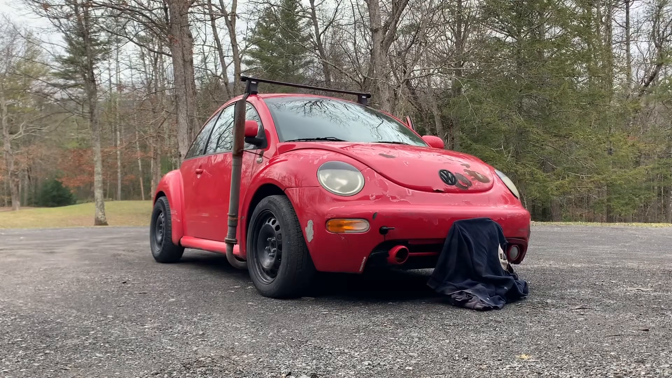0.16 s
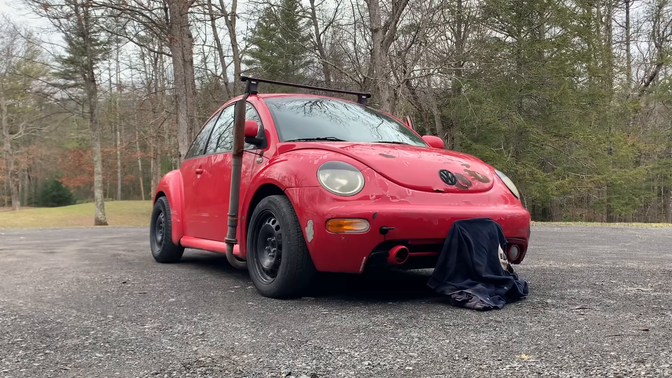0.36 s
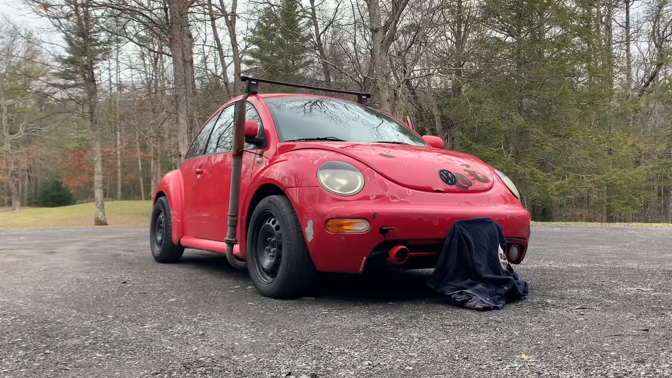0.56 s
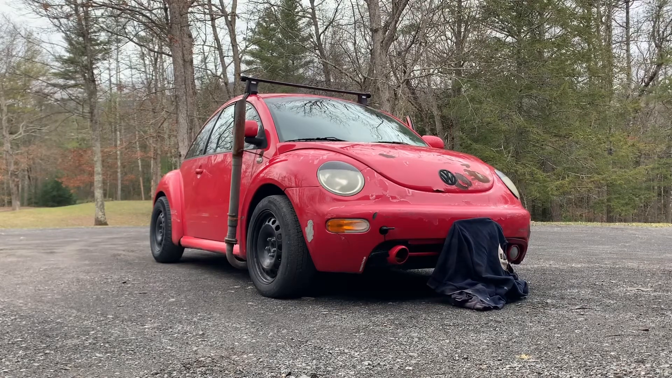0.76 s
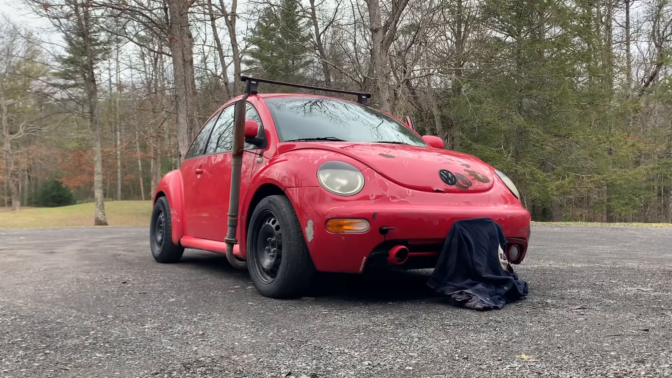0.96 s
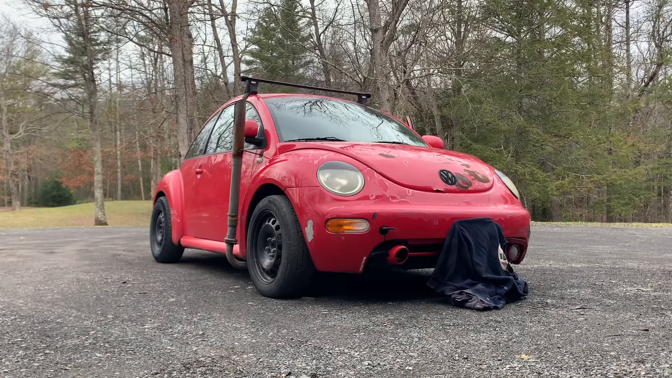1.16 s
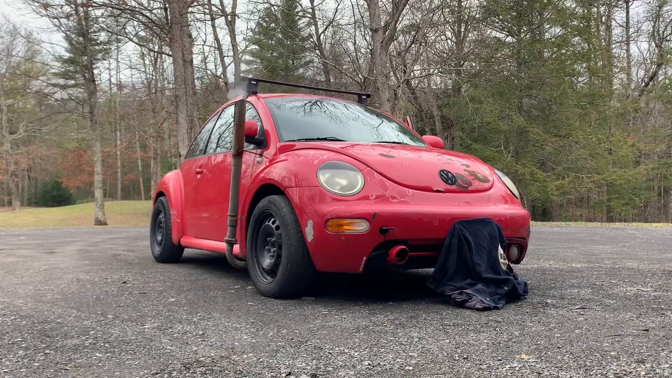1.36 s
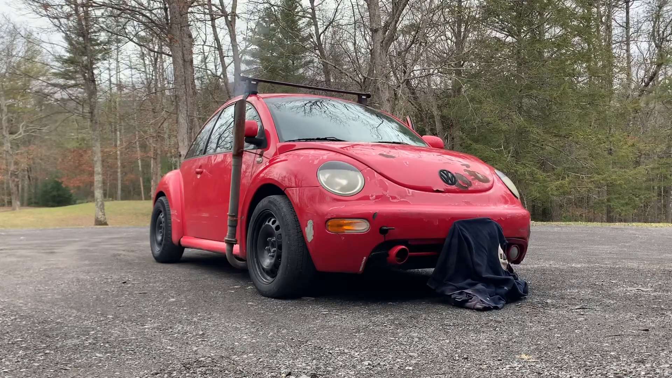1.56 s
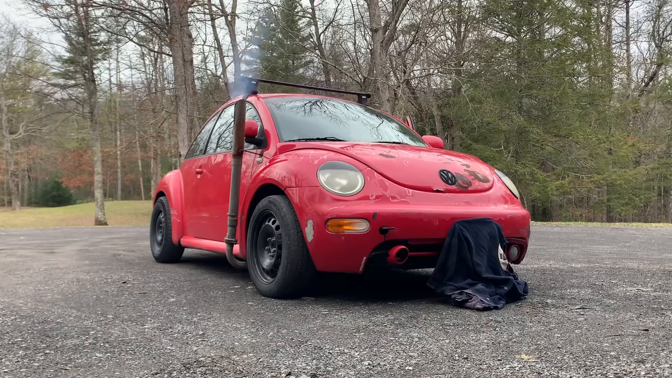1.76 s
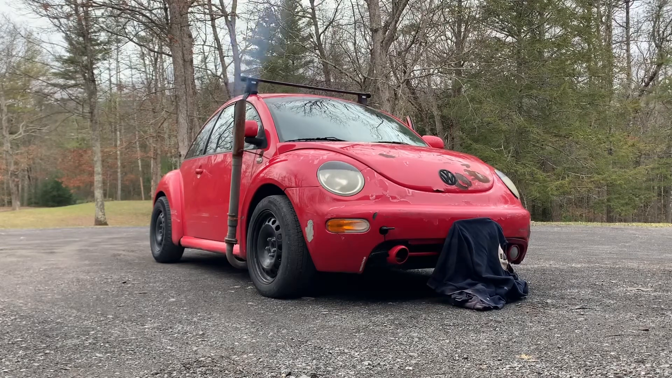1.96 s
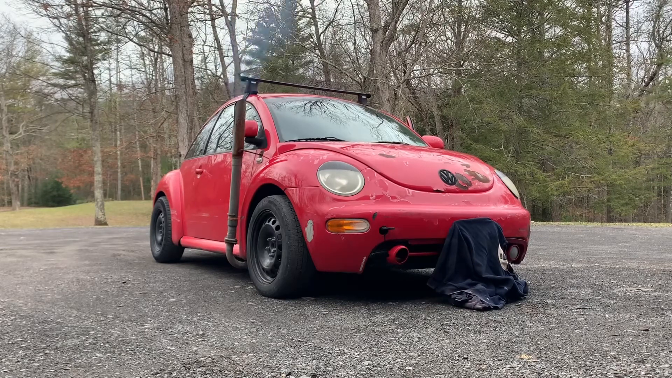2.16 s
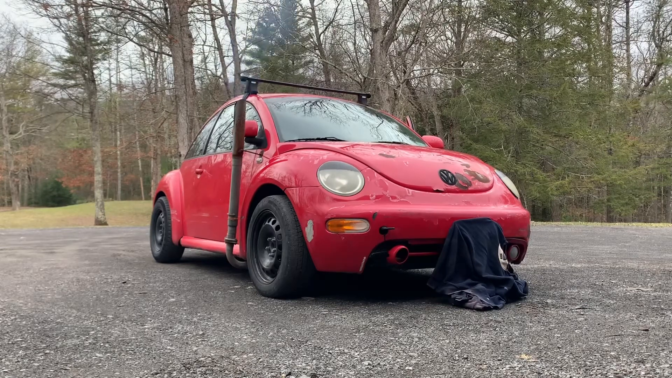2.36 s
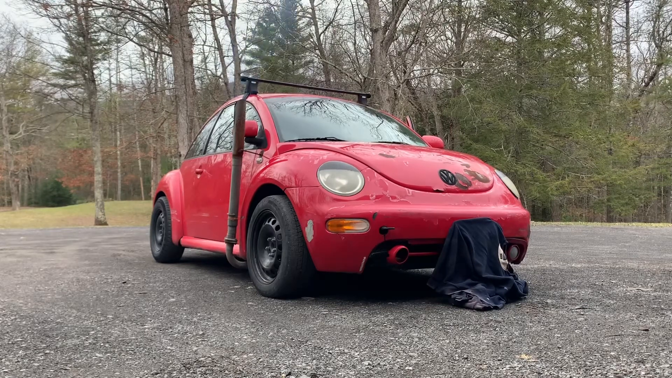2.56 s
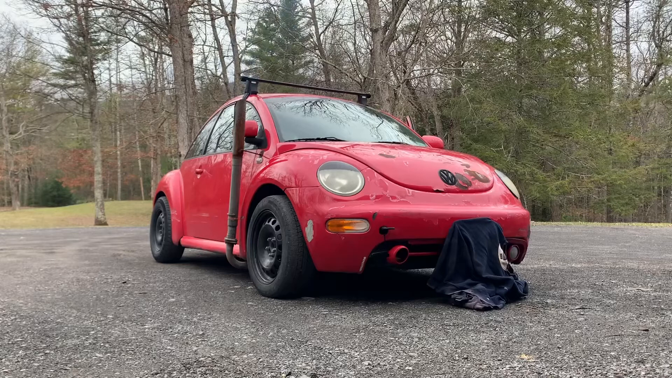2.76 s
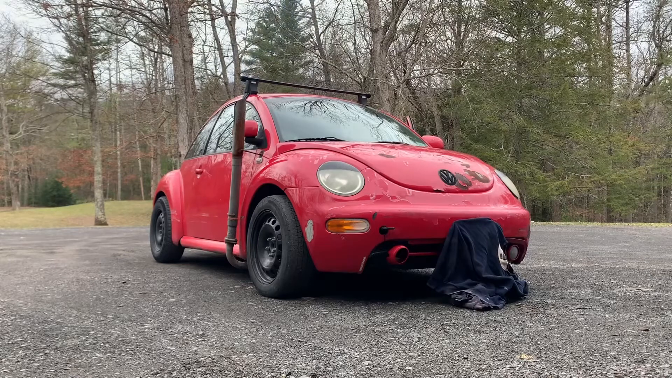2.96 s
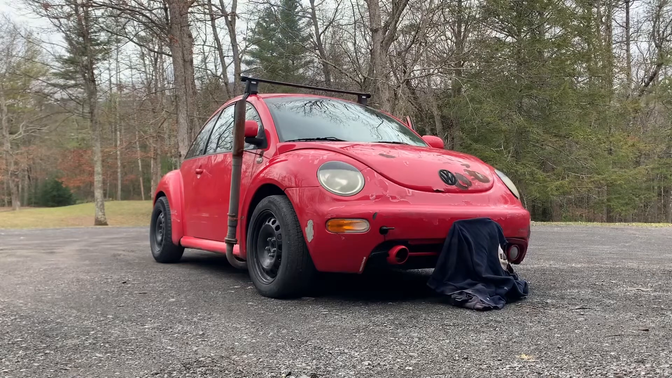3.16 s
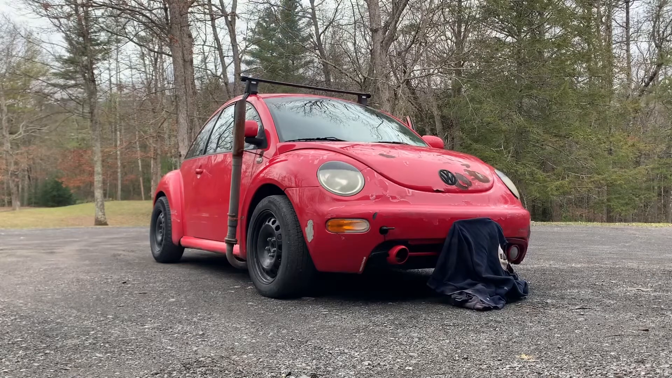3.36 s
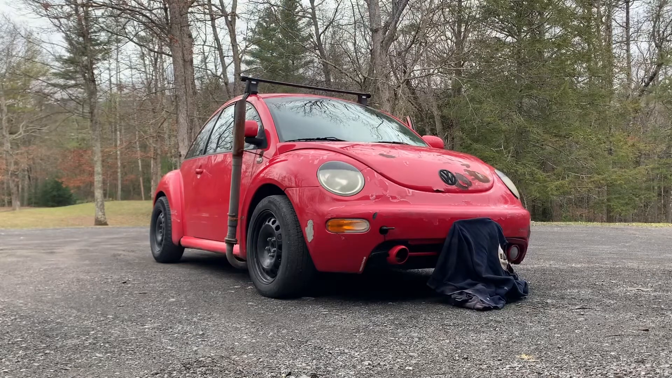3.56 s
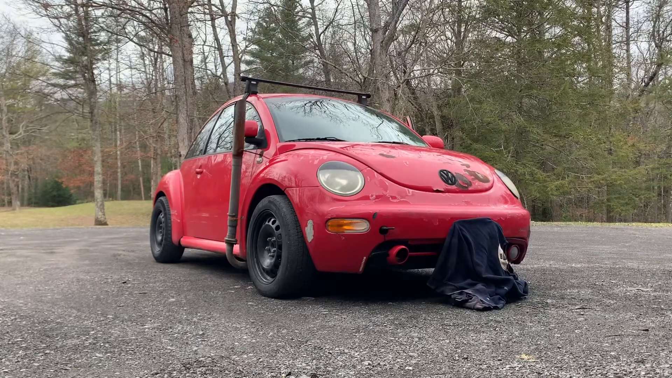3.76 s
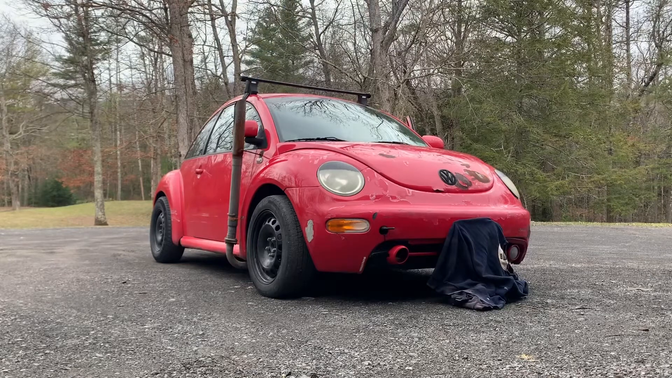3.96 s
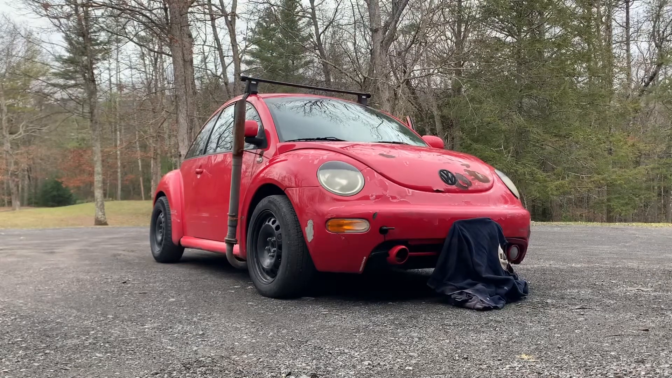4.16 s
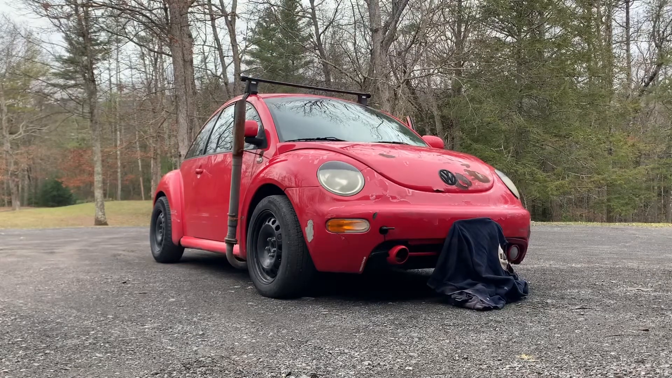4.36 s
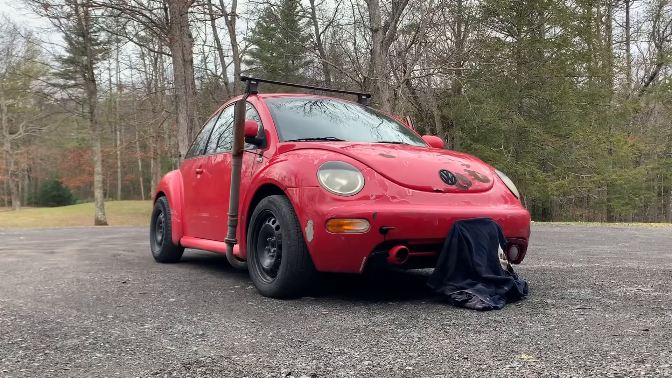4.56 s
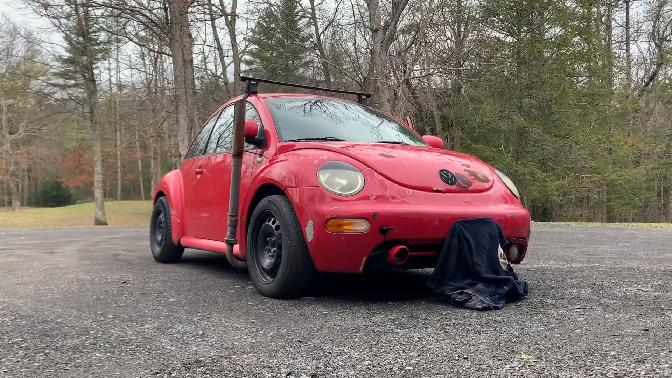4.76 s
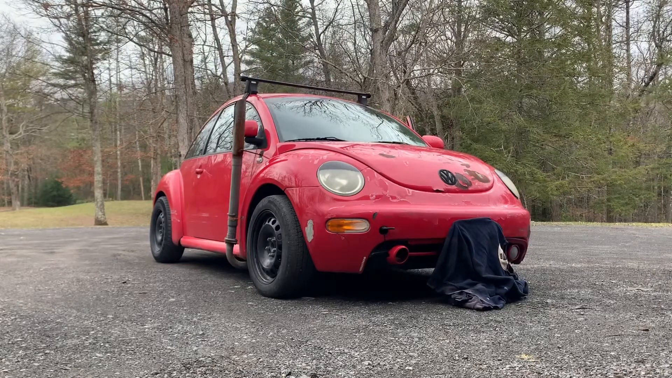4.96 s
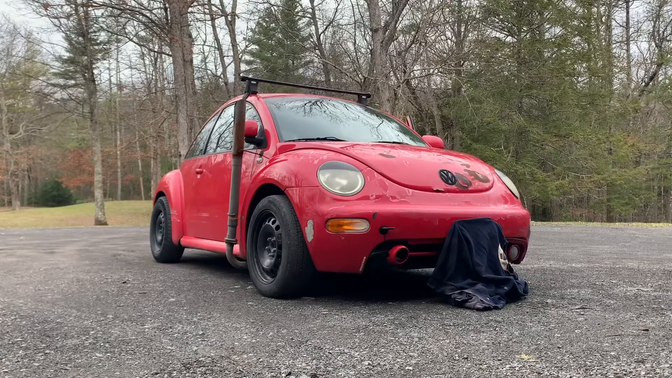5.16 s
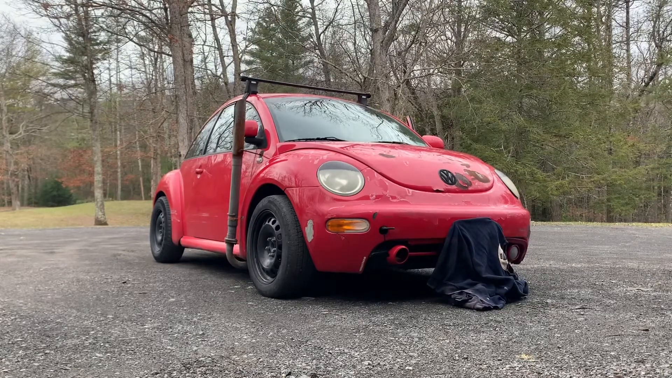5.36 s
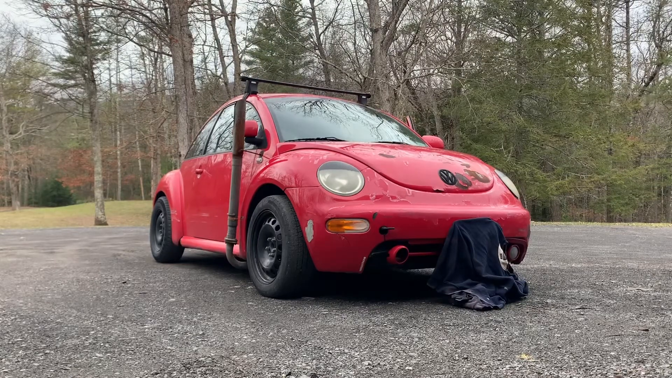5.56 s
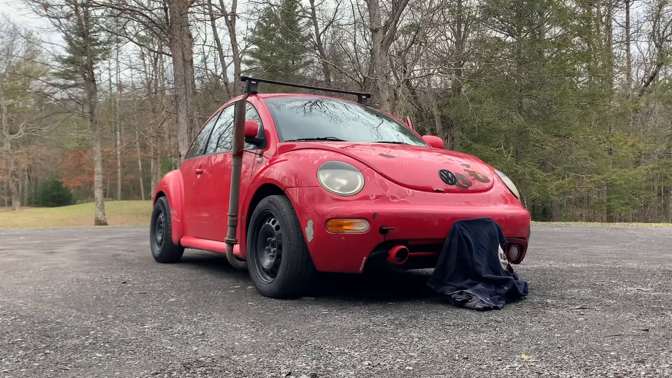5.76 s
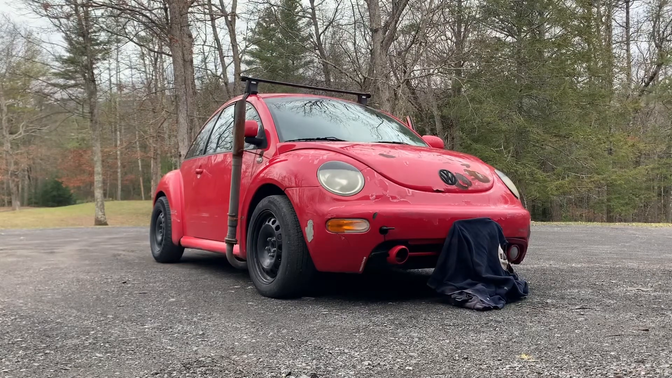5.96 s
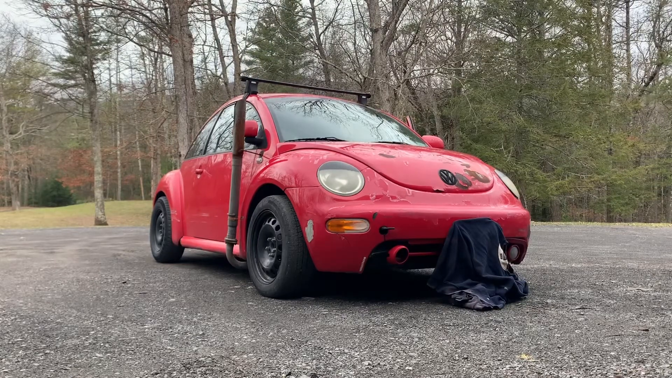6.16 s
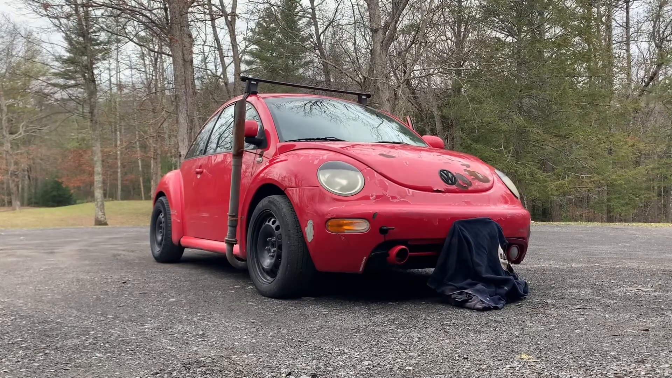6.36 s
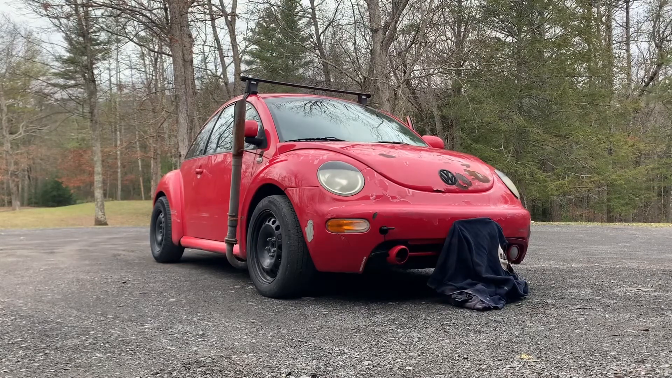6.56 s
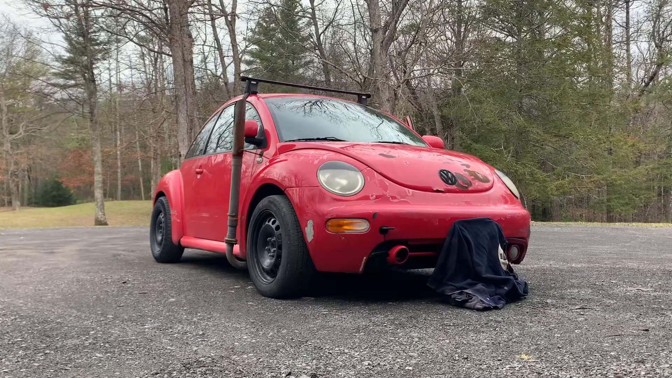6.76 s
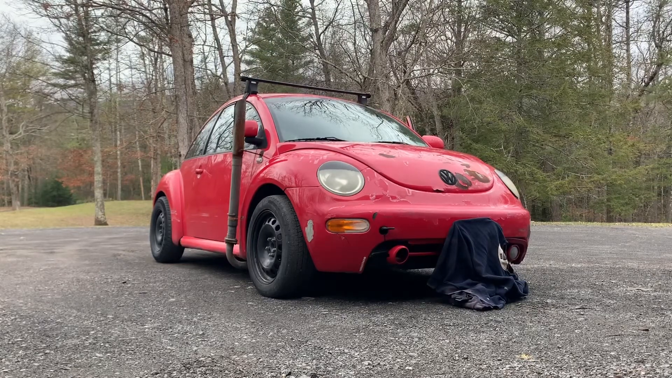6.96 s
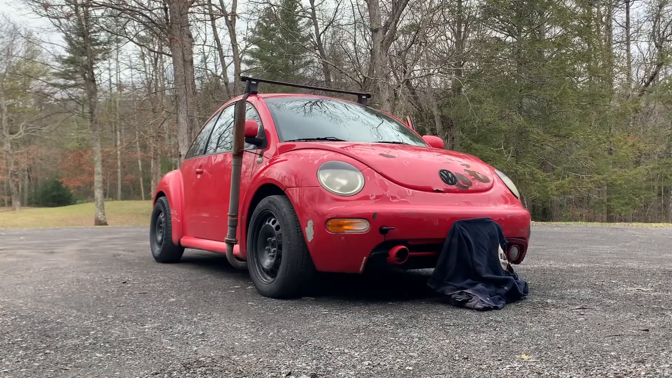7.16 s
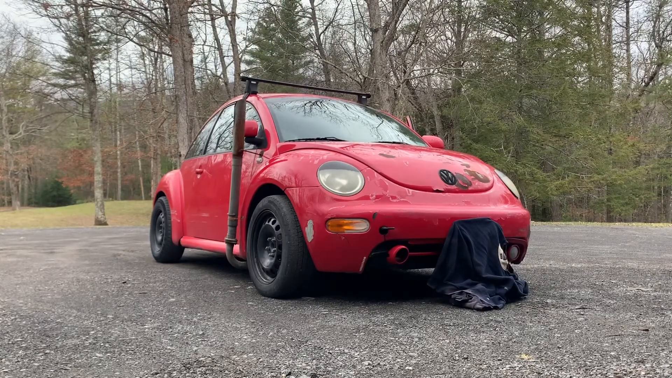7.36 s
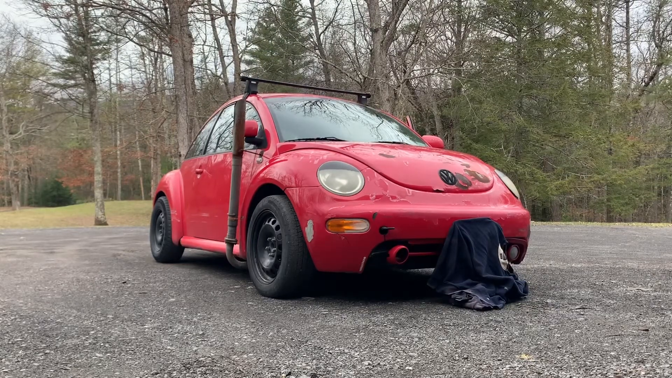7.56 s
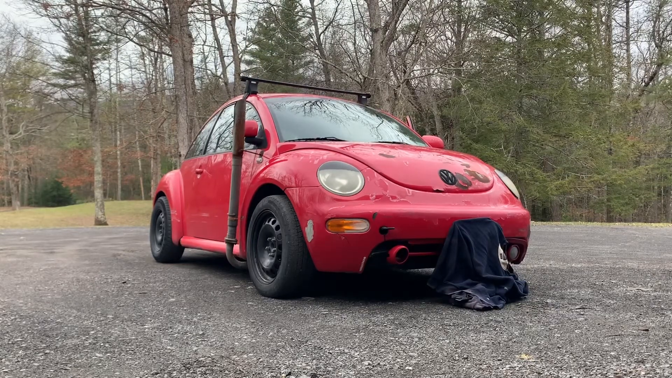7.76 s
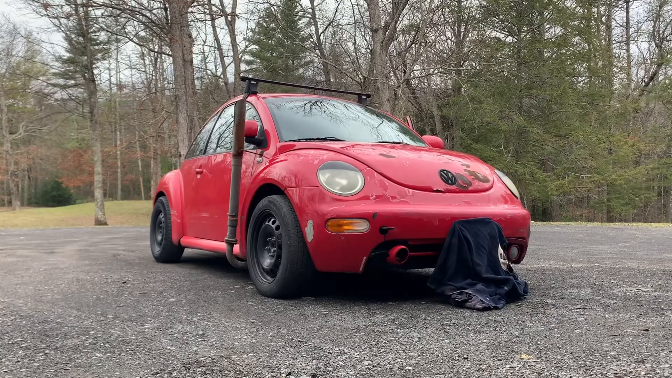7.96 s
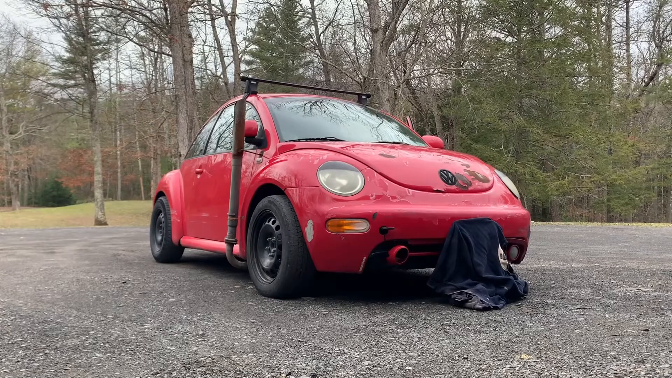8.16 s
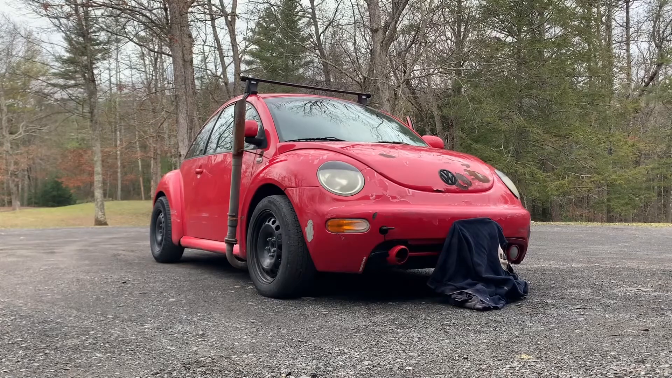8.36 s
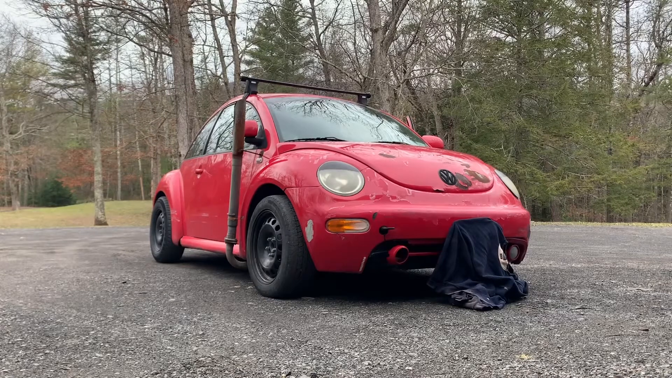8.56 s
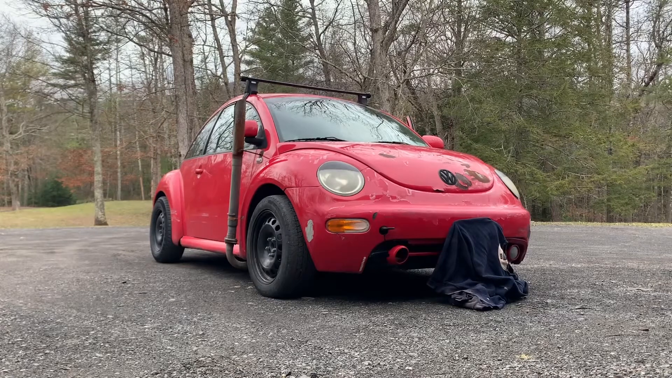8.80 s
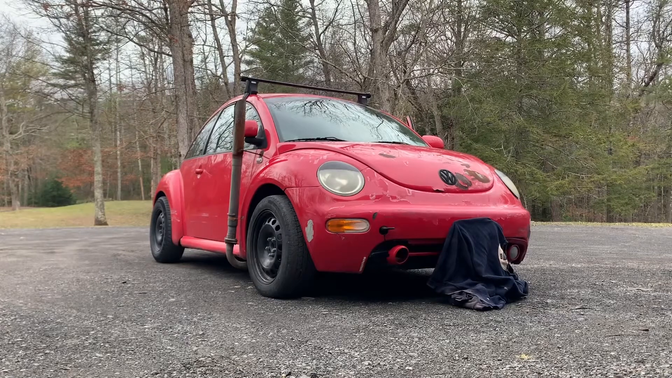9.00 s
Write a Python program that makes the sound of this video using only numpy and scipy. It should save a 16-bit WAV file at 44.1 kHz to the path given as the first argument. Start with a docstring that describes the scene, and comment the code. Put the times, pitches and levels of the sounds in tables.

```python
"""Over faint air noise a starter grinds in uneven strokes; a small four-cylinder turbodiesel then catches,
flares up and settles to idle. Puffs and their echoes excite pipe resonances; blows excite damped block
and panel modes; shaped noise bursts give clatter, ticks and hiss; a wavering sine gives the turbine whistle.
Popping pressure pulses and metal pings join in. Two microphone ports differ in phase, level and likeness."""
import sys
import numpy as np
from scipy import signal
from scipy.fft import rfft, irfft, next_fast_len
from scipy.io import wavfile
from scipy.ndimage import uniform_filter1d

SR = 44100
rng = np.random.default_rng(int(sys.argv[2]) if len(sys.argv) > 2 else 0)


def int16_out(signal):
    """Quantize to a 16-bit WAV file."""
    q = np.round(np.clip(np.atleast_2d(signal).T, -1, 1) * 32767)
    wavfile.write(sys.argv[1], SR, q.astype(np.int16))


N = 398223
T = np.arange(N) / SR
SIZE = next_fast_len(N + SR // 2)
HZ = np.fft.rfftfreq(SIZE, 1 / SR)

# Firing rate of the whole engine: t/s, rate/(firings per s)
FIRING = [(1.05, 27.48), (1.3, 38.56), (1.45, 41.78), (1.6, 39.94), (1.85, 35.23), (2.15, 32.36),
          (2.55, 30.95), (3.1, 31.32), (3.45, 31.12), (3.9, 31.28), (4.35, 30.86), (5.2, 31.12), (6, 30.98),
          (9.03, 30.88)]
# Span over which the hard ticking of the cold injectors eases off: start t/s, end t/s
COLD_TICKS_END_S = [3.7, 4.7]
# The engine catches: first firing, then rise, hold and fall of the surge (s)
CATCH_S, CATCH_RISE_S, CATCH_HOLD_S, CATCH_FALL_S = 1.1, 0.058, 0.11, 0.04
SKIP_S, SKIP_TURNS = 2.854, .75  # the rhythm skips ahead once (s, firing turns)


def amp(db):
    """Gain as the antilogarithm of a level in decibels."""
    return 10 ** (np.asarray(db) / 20)


def evened(x):
    """Normalisation to unit rms, so that a later gain sets the level."""
    return x / np.sqrt(np.mean(x ** 2) + 1e-20)


def curve(rows, axis):
    """Linear interpolation of one column of a time table at every sample."""
    return np.interp(T, np.array(rows)[:, 0], np.array(rows)[:, axis])


def read(points):
    """Interpolation of a frequency table at every bin, along logarithmic frequency."""
    f, value = np.transpose(points)
    return np.interp(np.log(HZ + 1), np.log(f + 1), value)


def noise(gain):
    """Spectral shaping: two independent strands of white noise filtered by a gain per bin."""
    white = rng.standard_normal((2, SIZE))
    return evened(irfft(rfft(white) * gain, SIZE)[:, :N])


def ringing(modes):
    """Modal superposition: the summed frequency response of damped resonances (f, width, gain)."""
    jw = 2j * np.pi * HZ
    response = 0
    for f, width, gain in modes:
        decay = np.pi * width
        response = response + gain * decay * 4 * np.pi * f / ((jw + decay) ** 2 + (2 * np.pi * f) ** 2)
    return response


def train(times, sizes):
    """Spectrum of an impulse train: one click of the given size at each time (s)."""
    samples = (times * SR).round().astype(int)
    return rfft(np.bincount(samples, sizes, SIZE)[:SIZE])


def bursts(turns, start, rise, fall, spread_db):
    """Periodic gating: one swift rise and exponential decay a firing, timed in turns, with random size."""
    since = turns - start
    scatter_db = spread_db * np.clip(rng.standard_normal(300), -2, 1.4)
    size = amp(scatter_db)[np.floor(since).astype(int) % 300]
    phase = since % 1
    return size * (1 - np.exp(-phase / rise)) * np.exp(-phase / fall)


def settling(seconds):
    """Exponential relaxation: 1 up to the end of the surge, then falling towards 0."""
    return np.exp(-np.maximum(T - CATCH_S - CATCH_RISE_S - CATCH_HOLD_S, 0) / seconds)


def level(idle_db, surge_db, cold_db, warm_s):
    """Gain by adding decibels: warm idle, the surge at the catch, and the cold start wearing off."""
    surge = np.clip((T - CATCH_S) / CATCH_RISE_S, 0, 1) * settling(CATCH_FALL_S)
    return amp(idle_db + surge_db * surge + cold_db * settling(warm_s))


def exhaust(turns):
    """Impulse excitation of resonators: puffs and manifold echoes ring the pipe, knocks ring the block."""
    # Cylinders, one row each: exhaust valve opening/firing turns, puff size, manifold echo gain,
    # echo delay/ms, knock size
    cylinders = [(-.359, 1.3, -.43, 4.12, 2.), (-.376, 1.32, -.43, 6.28, .52), (-.363, 1.5, -.31, 5.1, .31),
                 (-.373, 1.48, -.38, 6.39, .9)]
    # Resonances of the side pipe, then of the block: f/Hz, width/Hz, signed gain
    pipe_modes = [(89.5, 21.3, -.084), (108, 85.5, .06), (166.9, 18.6, -.072), (203.3, 12, .012),
                  (290, 12, .01)]
    block_modes = [(247.5, 12, -.006), (369.4, 12, -.004), (434, 22.3, -.004)]
    # Exhaust in the first firings, on top of the surge; the last row holds: t/s, level/dB
    first_puffs = [(1.05, -3), (1.1, -1.5), (1.16, -6), (1.22, -0.5), (1.3, 7), (1.35, -2.5), (1.43, 1),
                   (1.5, -2)]
    # Exhaust gain: warm idle level/dB, extra in surge/dB, extra when cold/dB, warming time/s
    exhaust_level = (-21.5, 5, 2, 2.5)
    puff_s, knock_turn = .77e-3, .598
    uneven_cold, uneven_warm, uneven_settle_s = 0.3, 0.065, 0.58  # relative scatter of the firings

    k = np.arange(1, int(turns[-1]) + 2)
    valve, puff, echo, echo_ms, knock = np.array(cylinders)[(k - 1) % 4].T
    at = np.interp(k + valve, turns, T, right=T[-1] + .02)
    here = np.minimum(at * SR, N - 1).astype(int)
    uneven = (uneven_warm + (uneven_cold - uneven_warm) * settling(uneven_settle_s))[here]
    chance = rng.standard_normal((len(k), 4)).T
    load = (level(*exhaust_level) * amp(curve(first_puffs, axis=1)))[here]

    puff = load * puff * (1 + uneven * chance[0])
    at = at + 0.0029 * uneven * chance[1]
    sounding = abs(at - SKIP_S) > .003  # a firing at the skip is silent
    puff = puff * sounding
    echo_at = at + echo_ms / 1000 * (1 + 0.93 * uneven * chance[2])
    puffs = train(at, puff) + train(echo_at, puff * echo)
    jwt = 2j * np.pi * HZ * puff_s
    pulse = jwt / (1 + jwt) ** 2  # band-pass shape of one puff

    knock_at = np.interp(k - 1 + knock_turn, turns, T)
    knock_size = load * sounding * np.roll(knock, 1) * (1 + 3.0 * uneven * chance[3])
    knocks = train(knock_at, knock_size)
    spectrum = puffs * ringing(pipe_modes) * pulse + knocks * ringing(block_modes)
    return irfft(spectrum, SIZE)[:N] * SR / 2.1


def thumps():
    """Pulse radiation: each pop from the pipe is one push and pull of air, stripped of its lowest bass."""
    # Hard pops while the cold engine catches and after: t/s, nominal level/dB, time scale/ms
    pops = [(1.2485, -10, 1.4), (1.2762, -11, 1.4), (1.3029, -12, 1.4), (1.318, -7, .2), (1.3215, -10, 1.2),
            (1.4283, -11, 1.2), (1.4575, -12, 1.2), (1.557, -8, 1.2), (1.6566, -7, 1.2), (1.7622, -7, 1.2),
            (1.8728, -8, 1.2), (1.9882, -10, 1.2), (2.845, -22, 5.)]
    out = np.zeros(N)
    for s, db, ms in pops:
        u = np.maximum((T - s) * 1000 / ms + .6, 0)
        out += amp(db) * u ** 2 * (3 - u) * np.exp(-u) * 1.5
    # the open pipe end radiates little below 60 Hz
    return signal.filtfilt(*signal.butter(2, 60, "high", fs=SR), out)


def knocking(turns):
    """Modal excitation: slightly irregular blows in each firing ring the panels, unlike in the two strands."""
    # Panels and covers that each combustion rings: f/Hz, width/Hz, gain
    panels = [(635, 10, 1.), (798, 30, 1), (986.5, 48, 0.45), (1127, 22, 0.86), (1383, 5.2, 0.19),
              (1947, 260, 0.33), (2256, 30, 0.33), (2545, 36, 0.78), (2970, 38, 0.31), (3058, 51, 0.39),
              (3900, 16, 0.16), (3725, 15, 0.47), (4510, 23, 0.027), (6140, 260, 0.021), (6600, 20, 0.035)]
    # Blows within one firing: place/firing turns, size
    blow_rows = [(.46, 1.), (.56, 1), (.68, .9), (.8, .6), (0.921, 0.43)]
    # Knock gain: warm idle level/dB, extra in surge/dB, extra when cold/dB, warming time/s
    knock_level = (-35, 10.5, -1.2, 18)
    spread_db = 2.5  # scatter from one blow to the next

    place, size = np.transpose(blow_rows)
    chance = rng.standard_normal((int(turns[-1]) + 1, len(blow_rows), 2))
    firing = np.arange(len(chance))[:, None]
    at = np.interp(firing + place + 0.0062 * chance[..., 0], turns, T)
    sizes = size * amp(spread_db * chance[..., 1])
    blows = train(at.ravel(), sizes.ravel())
    strands = []
    for side in (1, -1):  # every other panel is inverted in the second strand
        modes = [(f, width, gain * side ** k) for k, (f, width, gain) in enumerate(panels)]
        strands.append(blows * ringing(modes))
    return evened(irfft(strands, SIZE)[:, :N]) * level(*knock_level)


def block(turns):
    """Amplitude modulation: the crank gates noise into clatter, injector ticks and intake hiss; panels knock."""
    # Noise spectra of clatter, ticks and intake hiss: f/Hz, relative level/(dB per Hz)
    clatter_spectrum = [(25, -28), (50, 10), (120, 3), (250, 11.5), (450, 5.5), (560, -3.5), (1000, 0.5),
                        (1500, -5), (2000, -1), (3000, -10.5), (3500, -22), (5000, -62)]
    tick_spectrum = [(2000, -44), (3600, -1.5), (4500, 5), (5300, 2), (6500, 2), (8500, -7.5),
                     (11000, -8.5), (16000, -16.5)]
    hiss_spectrum = [(3000, 8), (6000, -10.5), (8500, -2.5), (10500, 6), (13000, -6.5), (16000, -3)]
    # Their gains: warm idle level/dB, extra in surge/dB, extra when cold/dB, warming time/s
    clatter_level = (-34.5, 5.5, 6, 2.5)
    tick_level = (-45.5, 9, 5, 5)
    hiss_level = (-42, 18, -18, 0.7)
    # Differences of the four injectors, most when cold, one entry each: level/dB
    tick_pattern_db = [-6.5, 4.5, 2.5, -2]
    spread_db = 4  # scatter from one tick to the next

    clatter = noise(amp(read(clatter_spectrum)))
    clatter = clatter * (0.72 + 2.84 * bursts(turns, 0.25, 0.14, 0.26, 4.1))

    cold = np.interp(T, COLD_TICKS_END_S, [1., .42])  # the injectors tick harder just after the start
    which = np.floor(turns - .44).astype(int) % 4
    injector = cold * amp(np.array(tick_pattern_db)[which] * settling(12.0))
    upper = 1 / (1 + (5400 / (HZ + 1)) ** 12)  # splits the ticks at 5400 Hz
    low_gate = .5 + 0.82 * injector * bursts(turns, 0.457, 0.022, 0.37, spread_db)
    high_gate = .5 + 1.6 * injector * bursts(turns, 0.54, 0.018, 0.3, spread_db)
    high_gate += .5 * bursts(turns, 0.32, .01, 0.056, 2.2)
    ticks = noise(amp(read(tick_spectrum)) * (1 - upper)) * low_gate
    ticks += 0.88 * noise(amp(read(tick_spectrum)) * upper) * high_gate

    hiss_gate = 0.47 + 1.18 * bursts(turns, 0.39, 0.041, 0.3, 3.0)
    hiss_gate += 2. * bursts(turns, 0.72, 0.017, 0.39, 6.2)
    hiss = noise(amp(read(hiss_spectrum))) * hiss_gate

    out = clatter * level(*clatter_level) + ticks * level(*tick_level) + hiss * level(*hiss_level)
    return (out + knocking(turns)) * np.clip((T - 1.04) / 0.081, 0, 1)


def turbo(turns):
    """Frequency and amplitude modulation: a whistle sways with each firing, wavers and has a breathy fringe."""
    # Base pitch of the turbine: t/s, f/Hz
    pitch_rows = [(1.1, 533), (1.215, 760), (1.31, 1302), (1.36, 1704), (1.5, 2110), (1.58, 2290),
                  (2.0, 2900), (2.27, 3070), (2.5, 3130), (2.7, 3618), (2.9, 3741), (3.17, 3640),
                  (3.25, 3150), (3.6, 2366), (3.8, 2102), (4.0, 1935), (4.28, 1813), (5.3, 1738),
                  (6.0, 1700), (7.1, 1688), (9.03, 1660)]
    # How loud the pipe lets the whistle out at each base pitch: f/Hz, level/dB
    outlet = [(530, -38), (800, -25), (1660, -31), (1750, -29.5), (2050, -28), (2350, -33.5), (2750, -36),
              (3100, -33), (3350, -40), (3650, -40)]
    ragged_cold, ragged_warm, ragged_s = 0.91, 0.14, 2.26  # raggedness, and its time to settle (s)
    slowing_db = -0.29  # fade while the revs fall, per firing a second lost each second
    surge_db, surge_s = 2, 0.11  # louder up to the end of the surge, then settling

    pitch = curve(pitch_rows, axis=1)
    slow_noise = uniform_filter1d(rng.standard_normal(N), size=5000)
    waver = evened(uniform_filter1d(slow_noise, size=5000))
    ragged = ragged_warm + (ragged_cold - ragged_warm) * settling(ragged_s)
    flutter = evened(uniform_filter1d(rng.standard_normal(N), size=300)) * ragged
    beat = 2 * np.pi * (turns - .68)  # one cycle a firing
    hz = pitch * (1 + 0.00212 * waver + 0.02493 * flutter) + 34. * np.sin(beat)
    swell = amp(4.0 * np.cos(beat) + 1.6 * np.cos(2 * beat + 2.0) + 6.5 * flutter)

    rev_loss = np.maximum(-np.gradient(curve(FIRING, axis=1)) * SR, 0)
    slowing = uniform_filter1d(rev_loss, size=4000)
    loudness = amp(slowing_db * slowing + surge_db * settling(surge_s))
    loudness = loudness * amp(np.interp(pitch, *np.transpose(outlet)))

    cycles = np.cumsum(hz) / SR
    fringe = evened(uniform_filter1d(rng.standard_normal(N), size=150))
    fringe_gain = 0.37 + 0.2 * settling(ragged_s)
    tone = np.sin(2 * np.pi * cycles) + fringe_gain * fringe * np.sin(2 * np.pi * 1.06 * cycles)
    return tone * swell * loudness * (T > pitch_rows[0][0])


def pings(turns):
    """Free vibration of lightly damped metal: two injectors ping, each once in four firings."""
    # Injector pings: place/firing turns, f/Hz, width/Hz, relative level/dB
    ping_rows = [(2.5, 6250, 140, 0), (3.5, 5750, 140, -2)]
    # Ping gain: warm idle level/dB, extra in surge/dB, extra when cold/dB, warming time/s;
    # the easing of the cold injectors lowers it further
    ping_level = (-45.5, .6, -1, 9)
    cycle = 4 * np.arange(int(turns[-1]) // 4)
    chance = rng.standard_normal((len(cycle), len(ping_rows)))
    spectrum = 0
    for k, (place, hz, width, db) in enumerate(ping_rows):
        clicks = train(np.interp(cycle + place, turns, T), amp(db + 2 * chance[:, k]))
        spectrum = spectrum + clicks * ringing([(hz, width, 1)])
    easing = np.interp(T, COLD_TICKS_END_S, [1, .3])
    return evened(irfft(spectrum, SIZE)[:N]) * level(*ping_level) * easing


def starter():
    """Resonant filtering of gear noise: strokes swell at each compression, with gritty harmonic mesh tones."""
    # Spectrum of the gear grind: f/Hz, relative level/(dB per Hz)
    grind = [(25, -1), (50, 2), (150, 7.5), (400, -10.5), (900, 2.5), (1500, -15), (2400, -25), (3300, -23),
             (5000, -14.5), (8000, -16), (16000, -27.5)]
    # Resonances of the starter housing: f/Hz, width/Hz, level/dB
    housing = [(455, 76, -3.5), (633, 17, 1.5), (1150, 9.1, 0), (1350, 77, -3), (1674, 69, 1),
               (1885, 100, 1.5), (2145, 72, -2.5), (2420, 39, -2), (2770, 52, -8), (4530, 79, -9),
               (4480, 36, -19), (5870, 91, -17)]
    # The starter labours over each compression: t/s, level/dB, rise/s, t60/s
    strokes = [(0.465, -29.5, 0.0086, 0.79), (0.486, -18.5, 0.0041, 0.17), (.54, -19, 0.06, 0.36),
               (0.65, -27.5, .005, 0.68), (.70, -13.5, 0.048, 0.27), (.841, -18.5, 0.013, 0.32),
               (0.968, -18.5, 0.01, 0.38), (1.069, -17.5, 0.0097, 0.14), (1.208, -33, .012, 0.4),
               (1.272, -18.5, .015, 0.87), (1.387, -18, 0.011, 0.2)]
    # The pinion's mesh sings: start t/s, length/s, swell level/dB, initial f/Hz, pitch sag/(Hz per s)
    pinion = [(0.528, 0.14, -37, 614, -150), (0.657, 0.19, -41.5, 459, 362),
              (.842, 0.097, -40.5, 513, 1109), (.968, 0.086, -35, 565, 500.5)]
    # Multiples of the mesh pitch, in order, against the swell: level/dB
    mesh_db = [4.5, 5, -22, -7]
    sudden_s = .03  # a stroke that rises quicker makes the pinion clack home
    clack_db, clack_t60_s = -5.5, 0.12  # level against the stroke, decay
    mesh_arch = 2.3  # sharpness of the mesh swell

    rings = sum(amp(db) / (1 + 2j * (HZ - hz) / width) for hz, width, db in housing)
    clacks = [(s, db + clack_db, .0005, clack_t60_s) for s, db, rise, t60 in strokes if rise < sudden_s]
    power = np.zeros(N)
    for s, db, rise, t60 in strokes + clacks:
        since = np.maximum(T - s, 0)
        power += (amp(db - 60 * since / t60) * (1 - np.exp(-since / rise))) ** 2
    out = noise(amp(read(grind)) * .5 + abs(rings)) * np.sqrt(power)

    grit = evened(uniform_filter1d(rng.standard_normal(N), size=250))
    for s, length, db, hz, sag_hz in pinion:
        since = np.clip(T - s, 0, length)
        mesh_hz = (hz - sag_hz * since) * (1 + 0.028 * grit)
        mesh = 2 * np.pi * np.cumsum(mesh_hz) / SR
        swell = amp(db) * abs(np.sin(np.pi * since / length)) ** mesh_arch
        partials = sum(amp(part_db) * np.sin((k + 1) * mesh) for k, part_db in enumerate(mesh_db))
        out = out + swell * partials
    return out


def air():
    """Stationary random noise: a faint, steady background in two independent strands."""
    # Spectrum of the background air: f/Hz, relative level/(dB per Hz)
    air_spectrum = [(18, -32), (30, -16), (70, -2), (167, -6.5), (260, -17), (815, -25), (1410, -33),
                    (1830, -32), (9150, -40), (12500, -35), (15000, -41)]
    return amp(-68.5) * noise(amp(read(air_spectrum)))


def scene():
    """Linear superposition in two strands: what both ports share, and what reaches the right one otherwise."""
    rate = curve(FIRING, axis=1) * (T >= FIRING[0][0])
    turns = -.28 + np.cumsum(rate) / SR + SKIP_TURNS * (T > SKIP_S)  # crank angle in firings
    direct = exhaust(turns) + turbo(turns) + thumps() + pings(turns)
    return direct * np.array([[1], [0]]) + block(turns) + starter() + air()


def record(dry):
    """Interchannel coherence: phase, balance and likeness vary with frequency; then soft clipping, band limit."""
    # Likeness of the two ports: f/Hz, coherence (0-1)
    same_rows = [(60, 0.99), (300, 0.97), (700, 0.88), (1200, 0.68), (2500, 0.58), (4000, 0.87),
                 (5500, 0.13), (7000, 0.38), (8500, 1), (9600, 0.77), (11000, 1), (12300, 0.46),
                 (13500, 0.98), (14700, 0.8), (15700, .97)]
    # Phase by which the left port leads: f/Hz, phase/rad
    lead = [(0, 0), (700, -.6), (1500, -.2), (2300, 1.1), (3400, 2.), (4500, .8), (6000, .2), (7000, -.8),
            (8200, -3.), (9000, -3.3), (10400, -6.2), (11600, -6.4), (12700, -9.3), (14000, -9.5),
            (15200, -12.5), (17000, -12.6)]
    # Balance, left minus right: f/Hz, level/dB
    tilt = [(60, 2.5), (130, 3), (290, 0.5), (640, -1.5), (1410, 0.5), (3100, -2.5), (6820, -2.5),
            (15000, 2)]
    edge_hz = 15900

    a, b = rfft(dry, SIZE) * (1j * HZ / (20 + 1j * HZ)) ** 2  # the deepest bass is removed
    same = np.clip(read(same_rows), 0, 1)
    port = np.exp(.5j * np.interp(HZ, *np.transpose(lead))) * amp(read(tilt) / 2)
    left = a * port
    right = (same * a + np.sqrt(1 - same ** 2) * b) / port
    pair = irfft([left, right], SIZE)[:, :N]
    pair = 1.3 * np.tanh(pair / 1.3)  # loud peaks round off
    low_pass = signal.firwin(511, edge_hz, window=("kaiser", 9), fs=SR)
    return signal.oaconvolve(pair, low_pass[None], "same")


dry = scene()
out = record(dry)
int16_out(out)
```